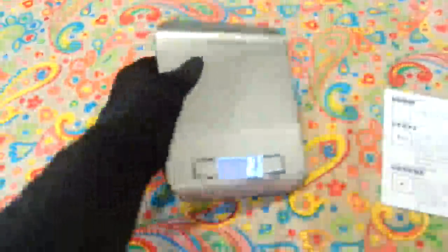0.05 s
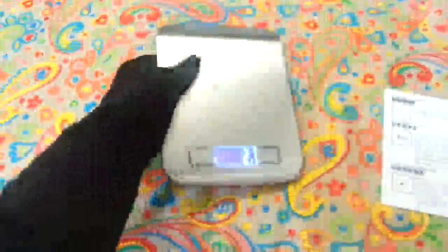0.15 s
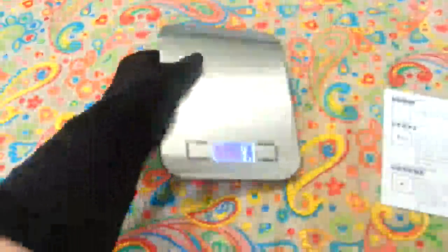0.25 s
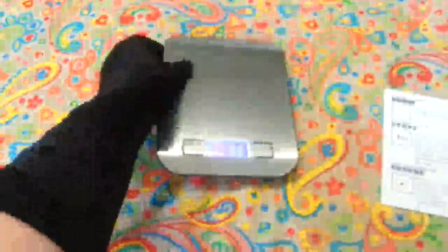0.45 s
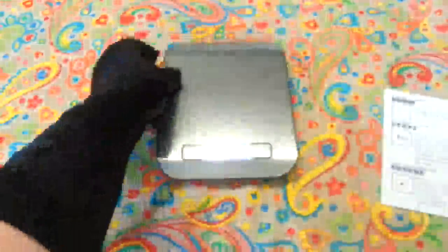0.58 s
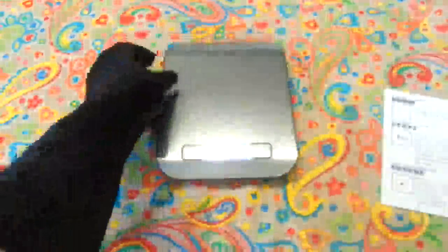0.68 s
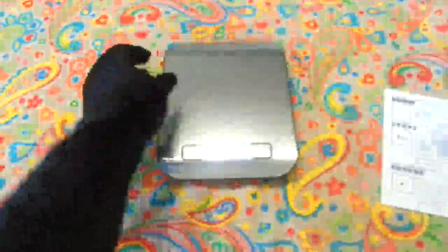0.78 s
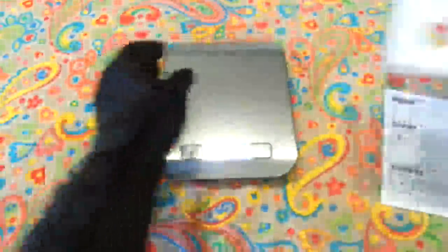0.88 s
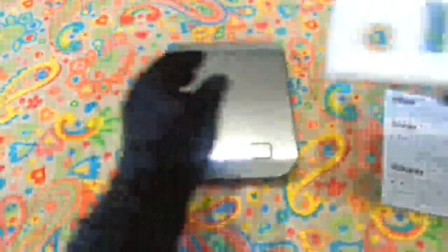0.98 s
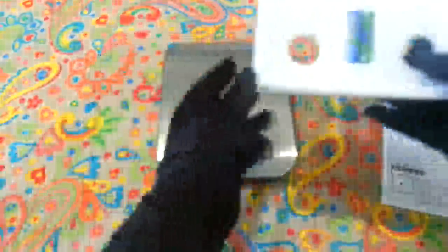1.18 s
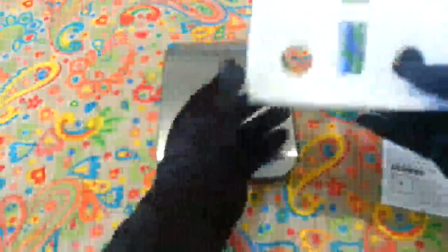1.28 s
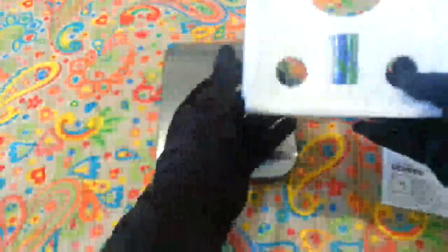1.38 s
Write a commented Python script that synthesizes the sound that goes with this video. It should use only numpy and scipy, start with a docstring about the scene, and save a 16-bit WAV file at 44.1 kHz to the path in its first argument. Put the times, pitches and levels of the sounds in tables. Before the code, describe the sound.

A kitchen scale is set down on a cloth-covered table, close to the microphone. One edge touches with a light hollow bump at about 0.25 seconds. From 0.45 to 0.6 seconds the other feet land with a louder thud and the platform rattles briefly. A gloved hand slides off faintly until about 0.9 seconds and brushes again around 1.3 to 1.4, over the low steady hiss of a small room.

```python
"""A steel-topped kitchen scale is set down on a cloth-covered table, close to a small camera.
One edge touches first with a hollow bump; then the other feet land, thump the table and rattle the platform.
A gloved hand slides off the casing and brushes about, over the steady hiss of a small room."""
import sys
import numpy as np
from scipy import signal
from scipy.fft import rfft, irfft, next_fast_len
from scipy.io import wavfile
from scipy.ndimage import map_coordinates

SR = 44100
rng = np.random.default_rng(int(sys.argv[2]) if len(sys.argv) > 2 else 0)


def output_pcm(signal):
    """Save a mono or channel-first signal as 16-bit PCM at the path in sys.argv[1].

    Samples are clipped to [-1, 1] before scaling.
    """
    pcm = np.clip(np.atleast_2d(signal).T, -1, 1) * 32767
    wavfile.write(sys.argv[1], SR, np.round(pcm).astype(np.int16))


N = 63945

# feet bouncing on the cloth (s, level dB, pitch of the bounce Hz)
BUMPS = [(0.2371, -32.5, 417), (0.2404, -32, 282.6), (0.263, -34, 312), (0.2769, -37.5, 413), (.2933, -48.5, 262), (.416, -52.5, 282),
         (0.4595, -39.5, 328), (.467, -37.5, 298), (0.485, -22.5, 450), (0.5094, -34, 364), (0.521, -38, 324),
         (0.5496, -42, 400), (0.7085, -51.5, 238)]
# hollow ring of the scale on its feet (Hz, dB, t60 s)
BODY = [(258, -20, 0.23), (283.6, -20.5, 0.24), (325.5, -10.5, 0.13), (402.4, -6, 0.0627), (542.7, -20, 0.23)]
# weight coming onto the table (s, level dB)
THUMPS = [(0.241, -46), (0.296, -45.5), (0.4621, -33.5), (0.471, -32), (0.5337, -31.5)]
# table top (Hz, dB, t60 s)
TABLE = [(96.2, -22.5, 0.26), (121.9, -7, 0.2), (133.8, -5.5, 0.156), (191.7, -5, 0.15)]
# the platform knocking in its housing (s, level dB)
CLACKS = [(0.237, -43), (.2445, -47), (.4695, -29.5), (0.4762, -55), (.4815, -46), (.487, -36.5), (0.493, -33), (.508, -37), (.5245, -36.5), (.5295, -29.5), (.536, -34), (.5665, -85), (.572, -37)]
# platform and housing (Hz, dB, t60 s)
PLATFORM = [(655, -17, 0.021), (778, -12, .04), (929, -7, 0.042), (973, -5, 0.028), (1276, -2, 0.038), (1336, 2, 0.031), (1920, -13, .02), (2480, -26, 0.026), (2780, -20, 0.02)]
CRACK = [(200, -11), (700, 6), (1400, 5), (2800, -5.5), (4500, -16), (8000, -46), (14000, -42)]  # (Hz, dB)
CRACK_DB, CRACK_T60_S, CLACK_PAN_DB, BUMP_PAN_DB = -3.5, 0.042, 3, 0.15
# fabric rubbing on the scale (s of the peak, level dB, rise s, fall s, treble tilt dB per octave, leftward pan dB)
STROKES = [(0.251, -51, 0.0054, 0.017, -5, -1), (.465, -57, 0.18, 0.017, -4, 0), (0.614, -53, 0.07, 0.17, -0.5, 6.5), (.704, -48.5, 0.0065, 0.023, -.8, 4.5), (.72, -54.5, 0.021, 0.095, -2.5, -2),
           (.86, -57.5, 0.028, 0.065, -1, 5), (1.289, -59, 0.017, 0.041, -3.5, 5), (1.385, -51, 0.01, 0.011, -1.5, 5)]
GLOVE = [(40, -42), (130, 4), (260, 2), (600, -8.5), (1800, 3), (3200, 0), (5000, 2), (6500, -4.5), (9000, -2), (13500, -8.5)]  # (Hz, dB)
GRAIN_HZ, GRAIN_DB = 477, 1
AIR = [(25, -16), (45, -11), (80, -5.5), (135, 1), (230, 0.5), (400, -1.5), (900, -3), (1400, -6), (2200, -6.5), (2750, -4), (3500, -10.5), (4700, -13.5), (6000, -17), (8500, -13.5), (13400, -14.5)]  # room tone (Hz, dB)
AIR_DB = -52.5
WHINE = [(905, -70), (2712, -71)]  # faint appliance tones (Hz, dB)
ALIKE = [(30, 0.31), (120, 0.3), (300, 0.14), (700, 0.025), (2000, 0.086), (12000, 0.13)]  # (Hz, left-right likeness)
ROOM = [(100, .55), (300, 0.37), (1200, 0.24), (4000, 0.68), (12000, 0.23)]  # (Hz, t60 s)
LOW_WET_DB, CLACK_WET_DB, ROOM_DELAY_S = -12.5, -7, 0.0045
LEFT_LEAD_S = 0.000275
TOP_HZ = 13600  # fixed
BOUNCE_CYCLES, BODY_DB = 1.21, -32.5
AIR_PAN_DB = -1
CLACK_ATTACK_S, CRACK_ATTACK_S = 0.0013, 0.0021
THUMP_ATTACK_S, THUMP_PAN_DB = 0.004, -0.2
CLACK_SPREAD = .035  # share by which the modes shift from contact to contact  # fixed


def amp(db):
    """Decibels to gain."""
    return 10 ** (np.asarray(db) / 20)


def unit(x):
    """Scale to rms 1."""
    return x / np.sqrt(np.mean(x ** 2) + 1e-20)


def along(points, hz):
    """Read (Hz, value) points on a log axis."""
    f, v = np.transpose(points)
    return np.interp(np.log(hz + 1), np.log(f + 1), v)


def wobble(rate):
    """A smooth random curve, rate knots a second."""
    return map_coordinates(rng.standard_normal(int(N * rate / SR) + 4), [np.arange(N) * rate / SR])


def filtered(x, response):
    """x times a response of frequency."""
    m = next_fast_len(N + SR // 2)
    return irfft(rfft(x, m) * response(np.fft.rfftfreq(m, 1 / SR)), m)[..., :N]


def since(s):
    """Seconds since s, zero before."""
    return np.maximum(np.arange(N) / SR - s, 0)


def fade(t, t60):
    """Exponential decay."""
    return np.exp(-np.log(1000) * t / t60)  # fixed


def noise(spectrum, tilt_db=0):
    """Diffuse stereo noise of rms 1, most alike in the bass."""
    turn = lambda hz: np.arccos(np.clip(along(ALIKE, hz), -1, 1)) / 2
    colour = lambda hz: amp(along(spectrum, hz) + tilt_db * np.log2(hz + 1))
    mid, side = filtered(rng.standard_normal((2, N)), lambda hz: colour(hz) * [np.cos(turn(hz)), np.sin(turn(hz))])
    return unit(np.array([mid + side, mid - side]))


def ring(modes, t, spread=0):
    """Decaying modes, t seconds after a blow; spread shifts their pitches at random."""
    return sum(amp(db) * fade(t, t60) * np.sin(2 * np.pi * hz * (1 + spread * rng.standard_normal()) * t) for hz, db, t60 in modes)


def placed(x, pan_db):
    """The sound reaches the left microphone first."""
    lead = lambda hz: np.exp(1j * np.pi * hz * LEFT_LEAD_S * np.array([[1], [-1]]))
    return filtered(x, lead) * amp([[pan_db], [-pan_db]])


def in_room(x, wet_db):
    """Add a diffuse tail in which each frequency dies at its own speed."""
    hz, t, z = signal.stft(noise([(1, 0)])[:, :SR // 2], SR, nperseg=256)
    tail = signal.istft(z * fade(t, along(ROOM, hz)[:, None]), SR, nperseg=256)[1]
    wet = signal.fftconvolve(x, tail / np.linalg.norm(tail[0]), axes=1)[:, :N]
    return x + amp(wet_db) * filtered(wet, lambda hz: np.exp(-2j * np.pi * hz * ROOM_DELAY_S))


def landing():
    """Cushioned feet ring the scale's body and the table under it."""
    feet = sum(amp(db) * bounce(since(s), hz) for s, db, hz in BUMPS)
    body = amp(BODY_DB) * signal.fftconvolve(feet, ring(BODY, since(0)))[:N]
    table = sum(amp(db) * ring(TABLE, since(s)) * (1 - np.exp(-since(s) / THUMP_ATTACK_S)) ** 2 for s, db in THUMPS)
    return in_room(placed(feet + body, BUMP_PAN_DB) + placed(table, THUMP_PAN_DB), LOW_WET_DB)


def rattle():
    """The loose platform clacks: short modes and a dull crack, both softened by the plastic housing."""
    modes, bursts = 0, 0
    for s, db in CLACKS:
        t = since(s)
        modes = modes + amp(db) * (1 - np.exp(-t / CLACK_ATTACK_S)) * ring(PLATFORM, t, CLACK_SPREAD)
        bursts = bursts + amp(db + CRACK_DB) * (1 - np.exp(-t / CRACK_ATTACK_S)) * fade(t, CRACK_T60_S)
    return in_room(placed(modes + bursts * noise(CRACK), CLACK_PAN_DB), CLACK_WET_DB)


def glove():
    """Grainy fabric friction swells and fades with each stroke."""
    t, out = np.arange(N) / SR, 0
    for s, db, rise_s, fall_s, tilt_db, pan_db in STROKES:
        swell = np.exp(-np.where(t < s, ((t - s) / rise_s) ** 2, np.abs(t - s) / fall_s))
        out = out + amp(db) * swell * placed(noise(GLOVE, tilt_db), pan_db)
    return out * unit(amp(GRAIN_DB * wobble(GRAIN_HZ)))


def room_tone():
    """Steady hiss with two faint wavering tones."""
    t = np.arange(N) / SR
    tones = sum(amp(db) * np.sin(2 * np.pi * hz * t + wobble(29)) for hz, db in WHINE)
    return placed(amp(AIR_DB) * noise(AIR), AIR_PAN_DB) + tones


def bounce(t, hz):
    """A cushioned contact: a few cycles that swell and die."""
    u = t * hz / BOUNCE_CYCLES
    return (u * np.exp(1 - u)) ** 2 * np.sin(2 * np.pi * hz * t)


def scene():
    """Everything at the two microphones."""
    return landing() + rattle() + glove() + room_tone()


def record(dry):
    """The camera keeps nothing above its band limit."""
    return filtered(dry, lambda hz: hz < TOP_HZ)


dry = scene()
out = record(dry)
output_pcm(out)
```